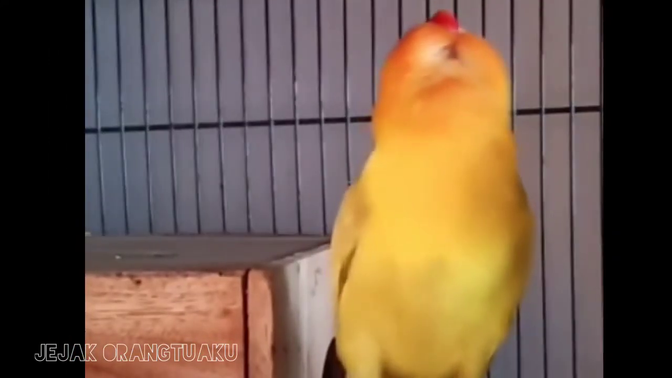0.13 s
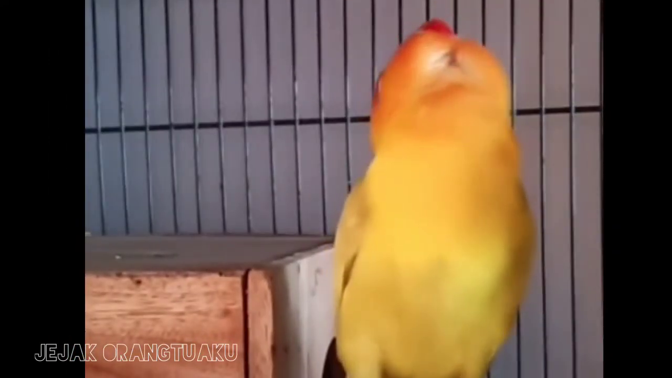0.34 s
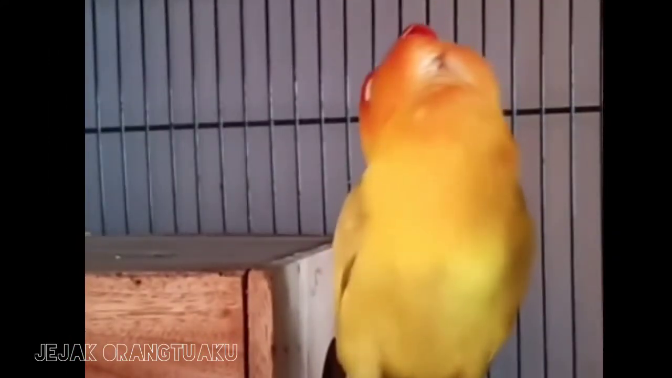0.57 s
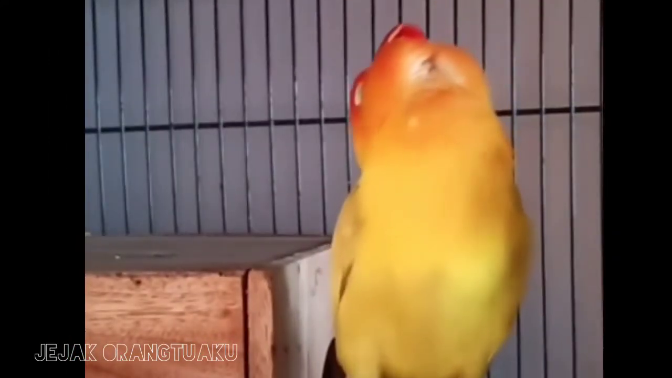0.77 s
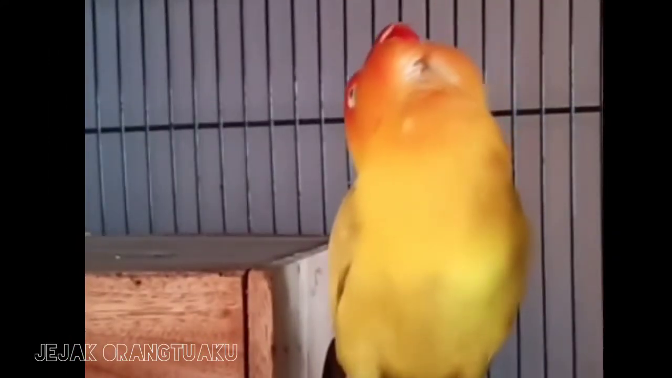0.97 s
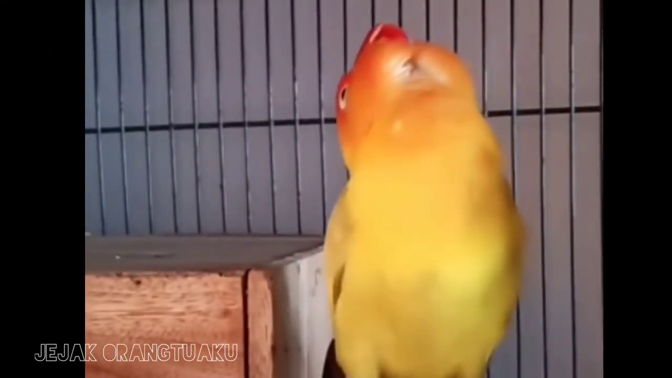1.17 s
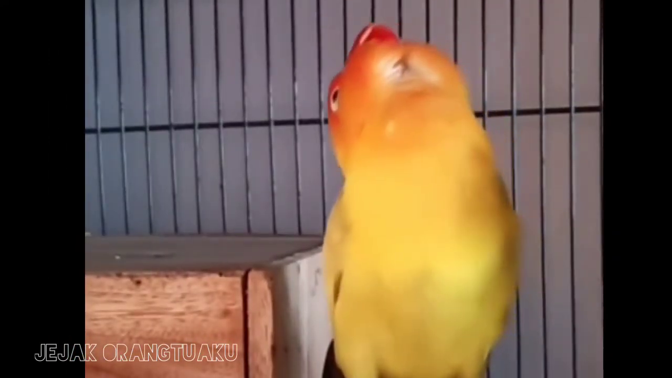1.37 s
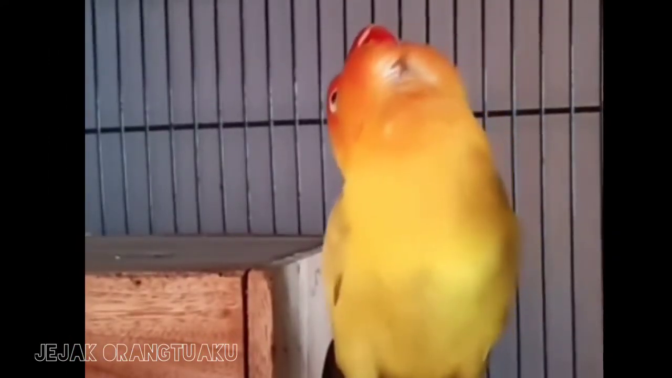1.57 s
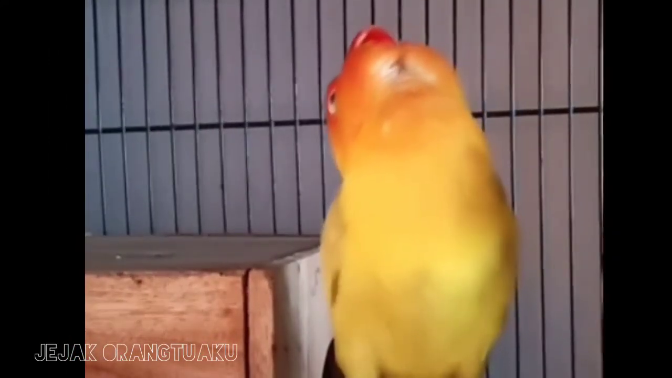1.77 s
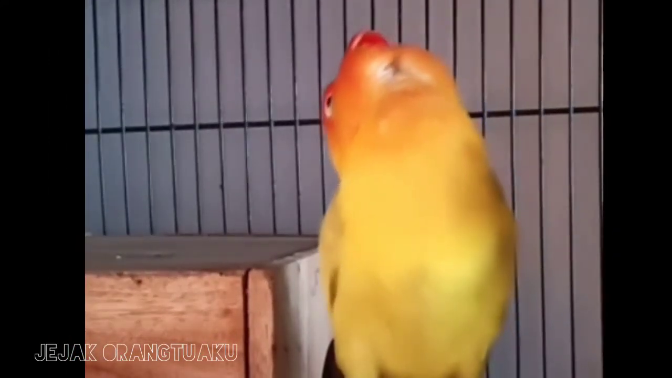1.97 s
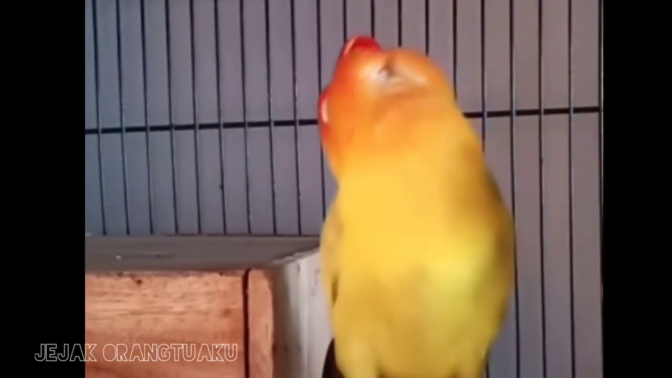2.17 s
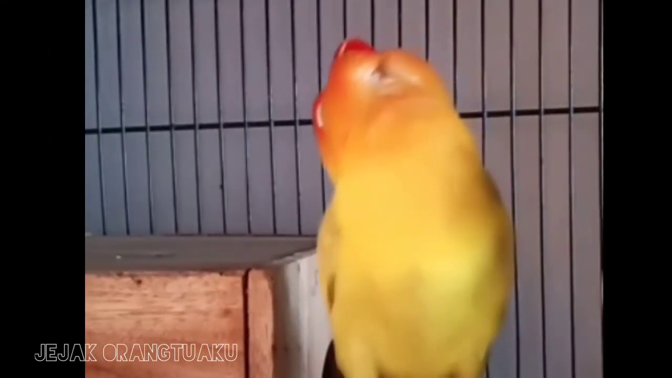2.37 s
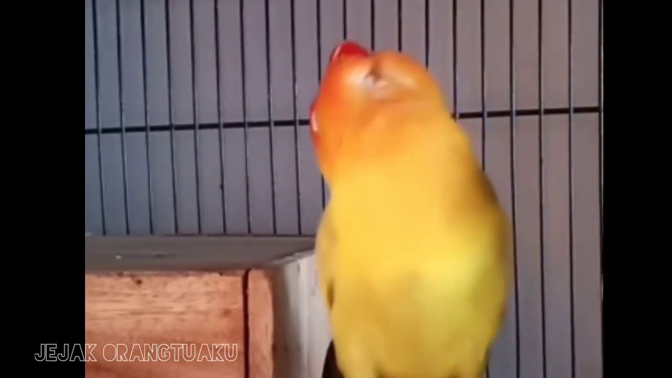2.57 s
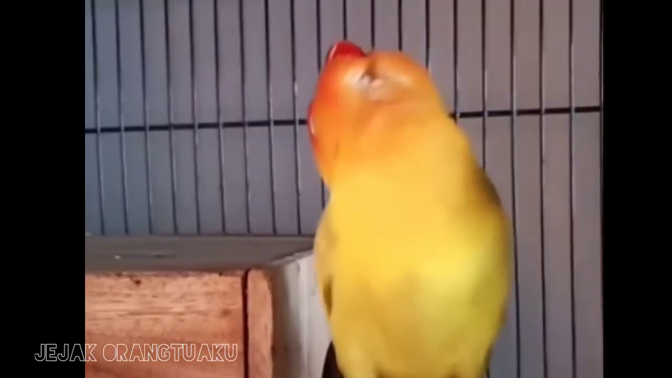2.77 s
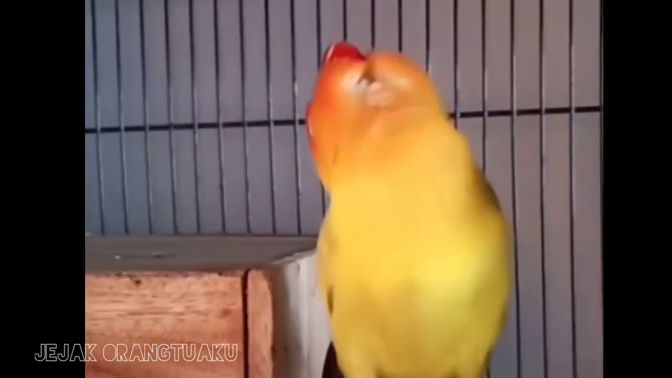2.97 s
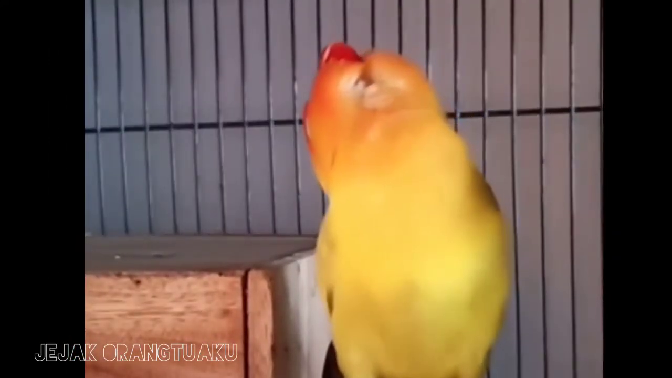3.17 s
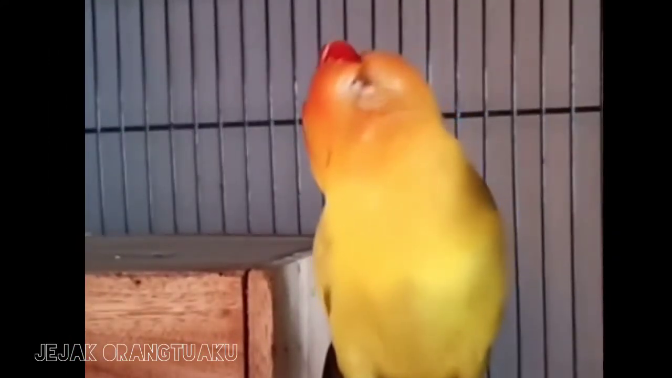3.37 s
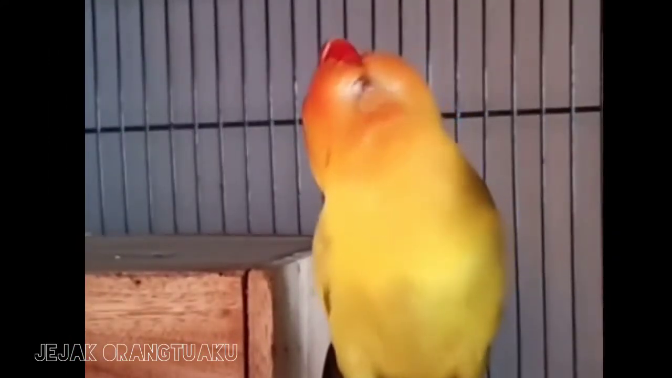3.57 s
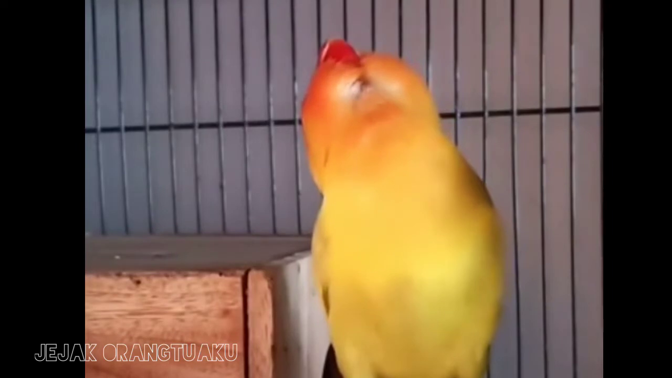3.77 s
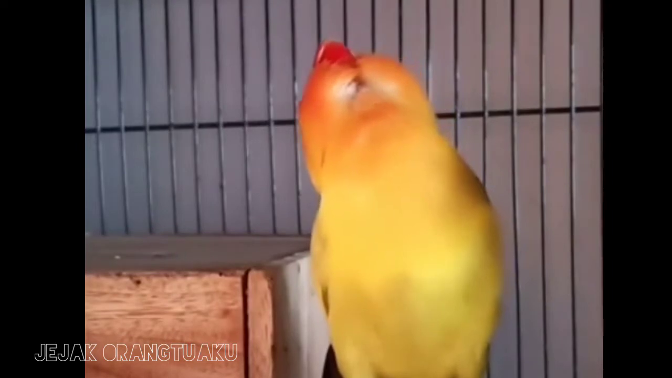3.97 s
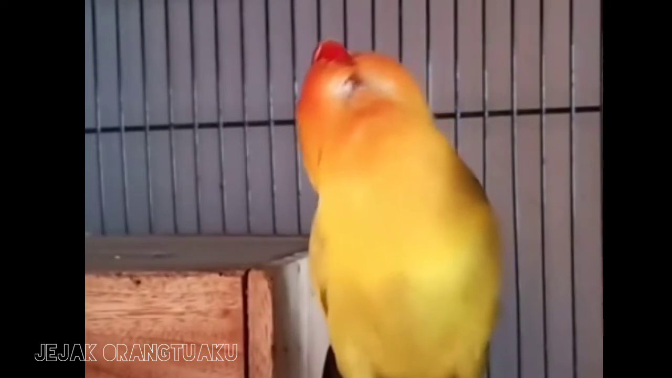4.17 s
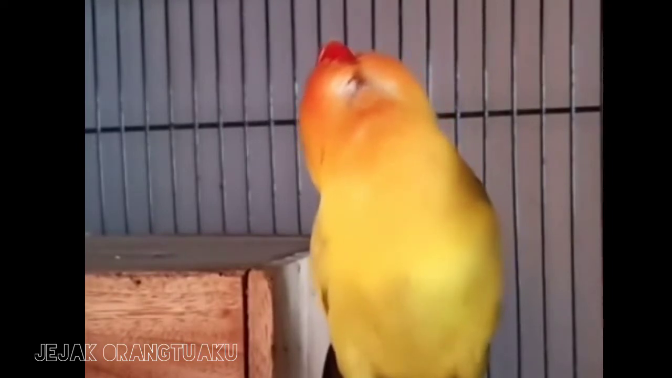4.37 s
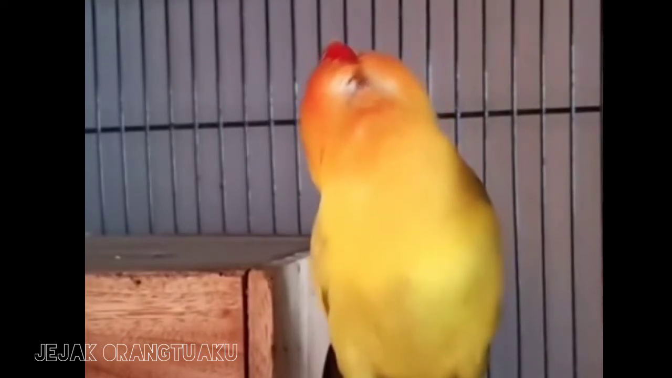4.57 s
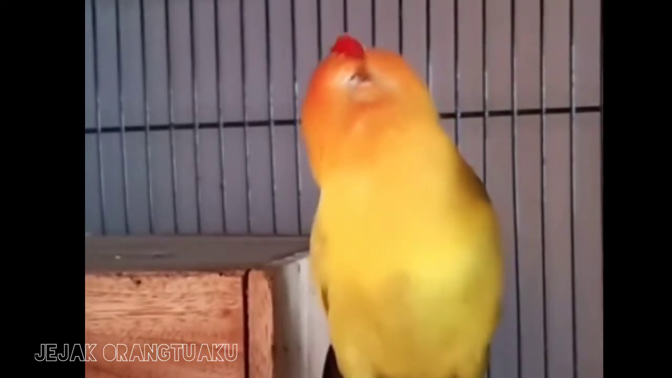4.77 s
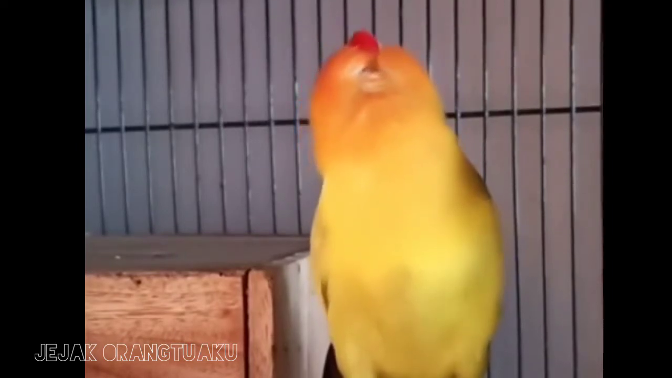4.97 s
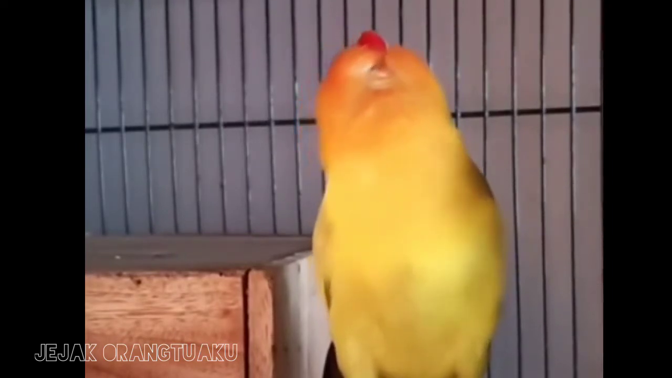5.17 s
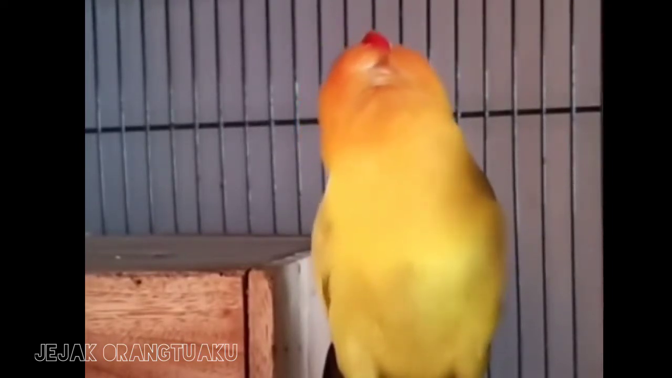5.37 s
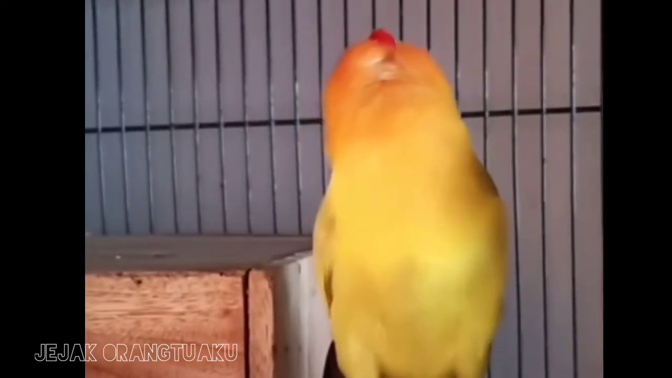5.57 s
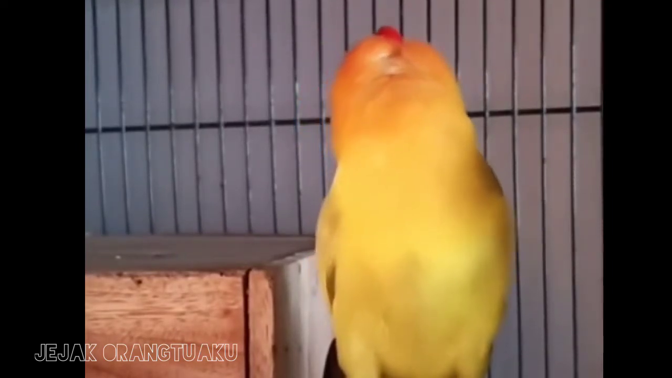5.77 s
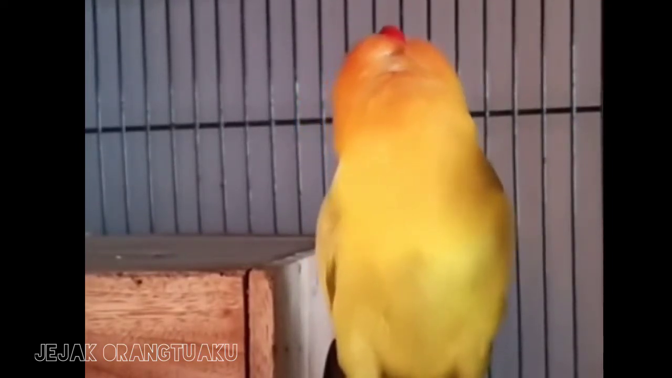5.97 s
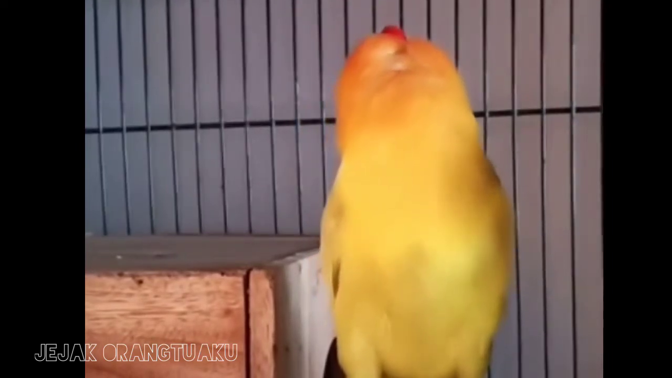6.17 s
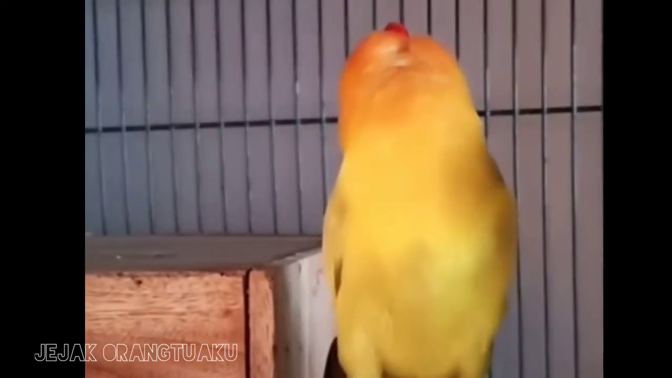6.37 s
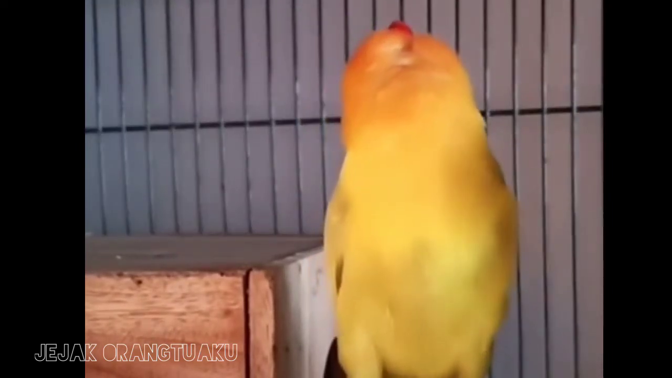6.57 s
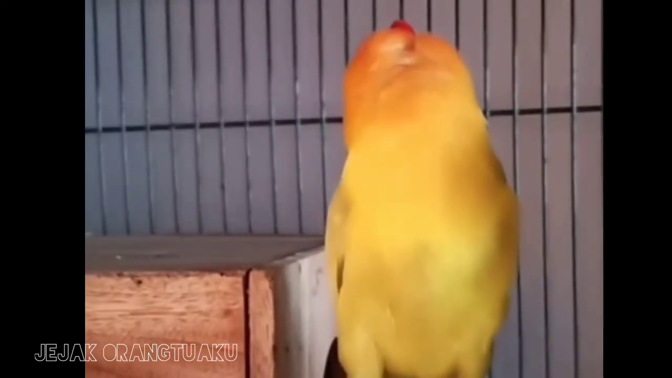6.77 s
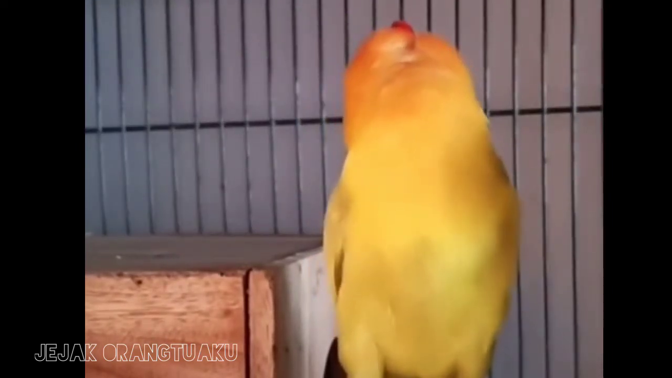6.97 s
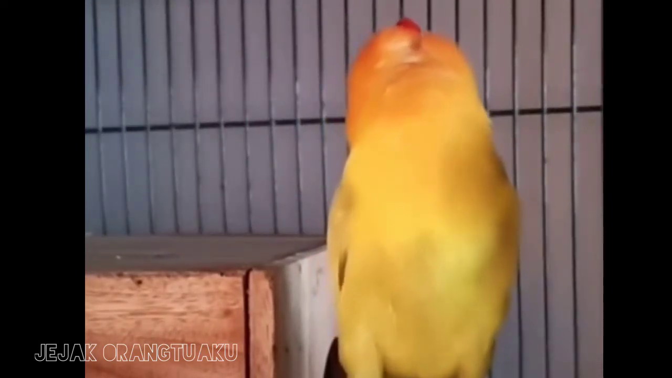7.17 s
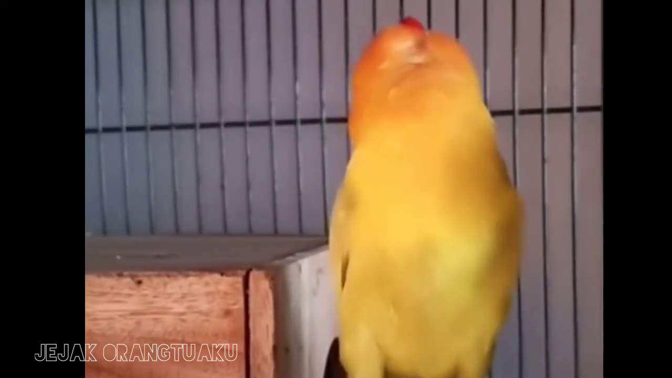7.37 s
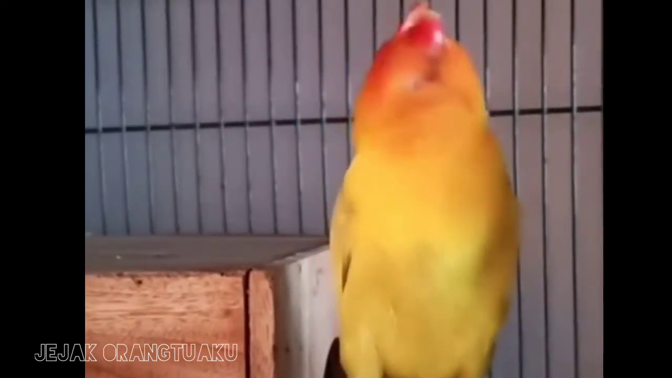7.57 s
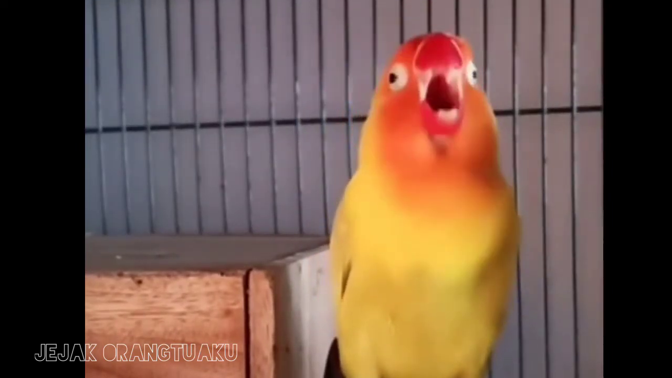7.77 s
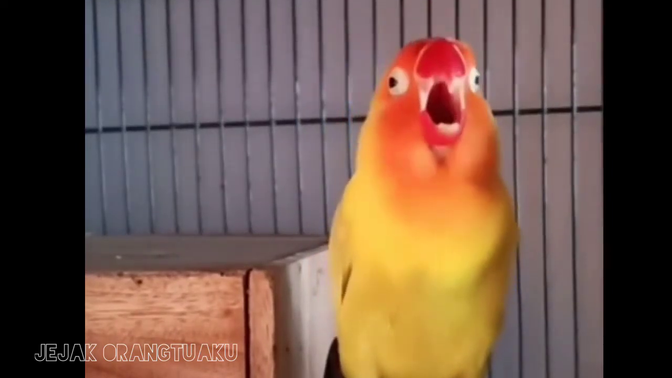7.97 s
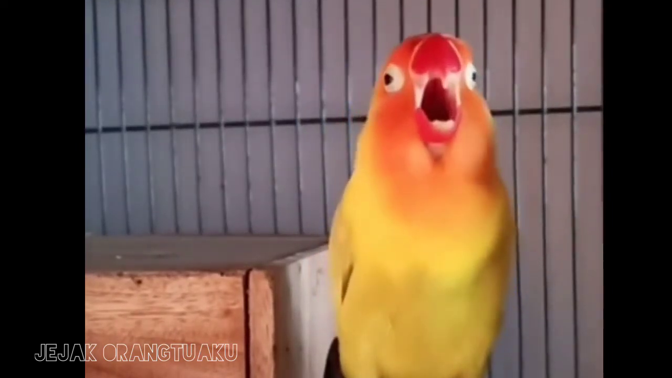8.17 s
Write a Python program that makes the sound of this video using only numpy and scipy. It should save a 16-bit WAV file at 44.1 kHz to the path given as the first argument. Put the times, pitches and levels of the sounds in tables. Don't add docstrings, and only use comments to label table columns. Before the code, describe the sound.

A small caged parrot very close to a stereo microphone fires short raspy chirps about nine per second, then shifts to longer, upward-turning chirps that gradually space out and stop. A bare room rings briefly after each. Outside, a lorry hums past and fades, a second engine follows, and faint bird whistles remain over a steady motor hum.

```python
import sys
import numpy as np
from scipy import signal
from scipy.fft import rfft, irfft, next_fast_len
from scipy.io import wavfile
from scipy.ndimage import uniform_filter1d, minimum_filter1d

SR = 44100
rng = np.random.default_rng(int(sys.argv[2]) if len(sys.argv) > 2 else 0)


def wav_record(signal):
    frames = np.transpose(np.atleast_2d(signal))
    bounded = np.clip(frames, -1, 1)
    quanta = np.round(bounded * 32767).astype(np.int16)
    wavfile.write(sys.argv[1], SR, quanta)


def gain_from_db(level_db):
    decades = np.asarray(level_db, float) / 20
    return 10 ** decades


N = 362943


def rms_one(x):
    return x / np.sqrt(np.mean(x ** 2) + 1e-20)


def at_hz(points, hz):
    points = np.array(points)
    return np.interp(np.log(np.maximum(hz, 1)), np.log(points[:, 0]), points[:, 1])


def noise():
    return rng.standard_normal(N)


def coloured(x, spectrum):
    gain = gain_from_db(at_hz(spectrum, np.fft.rfftfreq(N, 1 / SR)))
    return rms_one(irfft(rfft(x) * gain, N))


def filtered(x, order, hz, kind):
    return signal.sosfilt(signal.butter(order, hz, kind, fs=SR, output="sos"), x)


def wobble(hz):
    r = np.exp(-2 * np.pi * hz / SR)
    drift = signal.lfilter([1], [1, -2 * r, r * r], rng.standard_normal(N + SR))
    return rms_one(drift[SR:])


def turns(hz):
    return 2 * np.pi * np.cumsum(hz) / SR


def shape(start, knots, values):
    return np.interp(np.arange(N) / SR, start + np.asarray(knots), values)


# (pitch [Hz], level [dB])
THROAT_COLOUR = [(1300, -43), (1800, -21.5), (2300, -7.5), (3150, 0.5), (3800, -7), (4500, -9),
                 (5300, -5.5), (6400, -10.5), (7600, 4.5), (9000, -12.5), (11000, -19), (13600, -15),
                 (15200, -20), (16500, -7)]


def syrinx(pitch, second, rough, swing, depth_db, low_db=0, top_db=0, hook_db=0, count=9):
    pitch = pitch * (1 + 0.00302 * wobble(160) + swing * np.tanh(0.67 * wobble(490)))
    phase = turns(pitch)
    second_phase = turns(second * (1 + 0.033 * wobble(202.5)))
    clash = np.minimum(rough, 1)
    second_db = at_hz(THROAT_COLOUR, second) + low_db + 1.5 + 6.8 * wobble(152)
    out = clash ** 2 * gain_from_db(second_db) * np.sin(second_phase)
    beat = 1 + 0.85 * clash * np.cos(second_phase - phase)
    extra_db = {1: low_db, 2: hook_db, 3: -4 - hook_db, 4: 0}
    for k in range(1, count):
        shake_db = np.tanh(1.96 * wobble(384)) * depth_db * rough + 4.1 * wobble(70)
        level_db = at_hz(THROAT_COLOUR, k * pitch) + extra_db.get(k, top_db) + shake_db
        out = out + beat * gain_from_db(level_db) * np.sin(k * phase + k * k)
    return out


# (pitch [Hz], width [Hz], level [dB])
SOUND_HOLLOWS = [(3250, 380, -12), (5200, 450, -8), (13900, 800, -12)]


def dipped(x, hollows=SOUND_HOLLOWS):
    for hz, width_hz, db in hollows:
        band = signal.lfilter(*signal.iirpeak(hz, hz / width_hz, fs=SR), x)
        x = x - (1 - gain_from_db(db)) * band
    return x


# (time [s], level [dB], length [s], opening pitch [Hz])
CHATTER = [(-.043, -9, 0.043, 1830), (0.064, -13.5, 0.034, 1797), (0.175, -13, .044, 1795),
           (.285, -12.5, 0.041, 1832), (0.401, -14, 0.041, 1836), (0.513, -13.5, 0.044, 1799),
           (0.632, -12.7, 0.044, 1831), (0.751, -12, .05, 1876), (0.874, -12, .035, 1816),
           (.988, -13.5, .039, 1866), (1.108, -10, 0.039, 1850), (1.222, -12.5, 0.036, 1860),
           (1.338, -12.5, 0.04, 1838), (1.455, -12, 0.039, 1860), (1.572, -13, 0.049, 1829),
           (1.686, -13.5, 0.052, 1851), (1.808, -11, .036, 1862), (1.922, -13.5, 0.042, 1782),
           (2.031, -13.5, 0.046, 1848), (2.15, -13.5, 0.049, 1836), (2.278, -13.5, .048, 1898),
           (2.405, -12.5, 0.052, 1824), (2.531, -13.5, 0.05, 1828), (2.66, -11, 0.058, 1916)]
# (time [s], level [dB], length [s], opening pitch [Hz], closing pitch [Hz])
FULL_CHIRPS = [(2.793, -10, 0.064, 1845, 2287), (2.944, -11, 0.068, 1847, 2190),
               (3.105, -7, 0.067, 1815, 2187), (3.3, -9.5, 0.077, 1840, 2150),
               (3.505, -8.5, .078, 1795, 2145), (3.698, -9, 0.068, 1878, 2170),
               (3.889, -11, .078, 1846, 2128), (4.084, -10.5, 0.073, 1898, 2127),
               (4.278, -9, 0.077, 1851, 2171), (4.479, -9.5, 0.077, 1850, 2130),
               (4.68, -11, 0.079, 1877, 2100), (4.898, -10, 0.077, 1830, 2170),
               (5.127, -9.5, 0.072, 1875, 2175), (5.345, -11.5, .079, 1818, 2165),
               (5.567, -10.5, .079, 1880, 2120), (5.791, -12, 0.08, 1820, 2146),
               (6.01, -11.5, 0.073, 1831, 2105), (6.25, -11.5, 0.078, 1896, 2150),
               (6.487, -11.5, 0.077, 1840, 2146), (6.735, -11.5, 0.085, 1916, 2114),
               (7, -12.5, 0.083, 1888, 2244), (7.339, -12, 0.09, 1890, 2295)]


def song_controls():
    rattle_s, rattle_hz, settle_hz = 0.026, 1972, 2005.4
    low_open_db, low_rattle_db = -6.5, -4.5
    times, pitch, second, rough, level, wild, low_db = [], [], [], [], [], [], []
    song = [(*row, 2250) for row in CHATTER] + FULL_CHIRPS
    for s, db, length, opening, closing in song:
        bend, slip = 0.015 * rng.standard_normal(2)
        clean = 0.002 + 0.32 * length
        settle = min(clean + rattle_s, length - 0.004)
        calm = np.clip((length - 0.044) / 0.022, 0, 1)
        knots = [-0.0006, 0.0009, 0.005, clean - 0.001, clean + 0.002, settle, length - 0.002, length + 0.002]
        times += [s + t for t in knots]
        final_hz = settle_hz + calm * (closing - settle_hz)
        pitch += [0.93 * opening, 0.95 * opening, opening, (1.005 + bend) * opening]
        pitch += [rattle_hz * (1 + slip), settle_hz, final_hz, final_hz]
        second += 5 * [2250 + calm * (2496 - 2250)]
        second += 3 * [2800 + calm * (closing + 90 - 2800)]
        rough += [1.6, 0.6, 0.2, 0.2, 1 - 0.2 * calm, 1 - 0.4 * calm, 1 - 0.6 * calm, 1 - 0.65 * calm]
        level += [0, *(gain_from_db(db) * np.array([1.1, 1.4, 0.5, 0.79, 0.5, 0.39])), 0]
        wild += 8 * [1 - calm]
        low_db += 2 * [low_rattle_db] + 2 * [low_open_db] + 4 * [low_rattle_db]
    return [shape(0, times, values) for values in (pitch, second, rough, level, wild, low_db)]


# (pitch [Hz], level [dB per Hz])
BEAK_RASP = [(4400, -22), (6400, -3), (9000, 1), (12500, -5), (13900, -16), (15300, -5)]


def lovebird():
    pitch, second, rough, level, wild, low_db = song_controls()
    second = second * (1 + 0.05 * wild * wobble(250))
    swing = rough * (0.051 + 0.0739 * wild)
    hook_db = 4 * (rough < 0.55)
    voice = syrinx(pitch, second, rough, swing, 3.8, low_db, top_db=3.5 * wild, hook_db=hook_db)
    even = np.sqrt(uniform_filter1d(voice ** 2, size=600))
    breath = gain_from_db(-13 + 9.5 * wild) * (rough + 0.18) * coloured(noise(), THROAT_COLOUR)
    rasp = gain_from_db(-15) * (1 - wild) * (rough + 0.3) * coloured(noise(), BEAK_RASP)
    sound = dipped(level * (voice / even + breath + rasp))
    wild_share = 0.7 * wild
    return gain_from_db(7.5) * (wild_share * sound + (1 - wild_share) * dipped(sound, SOUND_HOLLOWS[::2]))


# (time [s], left minus right level [dB])
HEAD_TURNS = [(0, -1), (.6, 1.5), (.9, 0), (3.1, -0.5), (3.5, -2), (3.8, 1), (4.15, -2), (4.7, 1.5),
              (5, -1), (5.5, -0.5), (6.9, .5), (7.3, 1.5)]


def head_turned(near):
    pan_db = shape(0, *np.transpose(HEAD_TURNS))
    return near * gain_from_db(pan_db * [[0.5], [-0.5]])


# (pitch [Hz], lead [radians])
PORT_LEAD = [(0, -3.5), (1810, -3), (2410, -7.5), (3960, -10.5), (4910, -13), (5770, -9), (6200, -8.5),
             (6980, -7.5), (7670, -9.5), (8180, -11.5), (10100, -22), (12600, -43.5), (13400, -22),
             (16400, -53.5)]
# (pitch [Hz], left minus right level [dB])
PORT_TILT = [(60, 6), (110, 0.0), (200, -44), (380, -22), (700, -7.5), (1290, 0.5), (2380, -0.5),
             (4400, 3.5), (8120, -2), (15000, 3)]
# (lag [s], level [dB])
NEAR_WALLS = [(.0021, -10), (.0046, -8.5), (.0083, -6.5), (0.0139, -19.5), (0.0187, -19)]


def ports(x):
    size = next_fast_len(N + 4096)
    hz = np.fft.rfftfreq(size, 1 / SR)
    half = gain_from_db(at_hz(PORT_TILT, hz) / 2) * np.exp(0.5j * np.interp(hz, *np.transpose(PORT_LEAD)))

    def walls(skew):
        return 1 + sum(gain_from_db(db) * np.exp(-2j * np.pi * hz * lag * skew) for lag, db in NEAR_WALLS)

    paths = np.array([half * walls(0.86), walls(1.17) / half])
    return irfft(rfft(x, size) * paths, size)[:, :N]


# (pitch [Hz], time to fall 60 dB [s])
ROOM_RING = [(1000, 0.45), (2200, 0.72), (4000, 0.54), (7500, 0.45), (11000, 0.38), (16000, 0.31)]


def room(x, alike):
    size, t = next_fast_len(N + SR), np.arange(SR) / SR
    x = filtered(x, 4, 1500, "high")
    white = rng.standard_normal((3, SR)) * (1 - np.exp(-np.maximum(t - 0.003, 0) / 0.0018))
    edges = np.geomspace(700, 19000, 9)
    tails = 0
    for low, high in zip(edges, edges[1:]):
        ring_s = at_hz(ROOM_RING, np.sqrt(low * high))
        tails = tails + filtered(white, 2, [low, high], "band") * gain_from_db(-60 * t / ring_s)
    echoes = irfft(rfft(x, size) * rfft(tails / np.sqrt(SR / 20), size), size)[:, :N]
    return np.sqrt(alike) * ports(echoes[0]) + np.sqrt(1 - alike) * echoes[1:]


# (time [s], nearness level [dB])
LORRY = [
    (0, -6.5),
    (.6, -2),
    (1.0, -2.5),
    (1.9, 0.5),
    (2.3, -6.5),
    (2.75, -5),
    (3.2, -16.5),
    (3.9, -29),
    (6.3, -45),
]
# (time [s], nearness level [dB])
ENGINE = [
    (3.9, -21),
    (4.25, -1.5),
    (4.65, -2),
    (5.0, -5),
    (5.9, -1),
    (6.2, -9.5),
    (6.45, -3.5),
    (7.2, -12.5),
    (7.45, -24),
]


def passing(lorry_db, lorry_share, engine_db, engine_share):
    lorry, engine = [shape(0, *np.transpose(rows)) for rows in (LORRY, ENGINE)]
    return np.hypot(gain_from_db(lorry_db + lorry_share * lorry), gain_from_db(engine_db + engine_share * engine))


# (pitch [Hz], level [dB per Hz])
RUMBLE_COLOUR = [(88, -32), (150, -4), (189, -24.5), (312, -16), (354, -19), (393, -16.5), (600, -46),
                 (780, -50), (1320, -120)]
# (pitch [Hz], level [dB per Hz])
TYRE_COLOUR = [(260, -23), (450, 0), (1020, -3), (1190, 1), (1360, -14.5), (1600, 2), (2080, -20),
               (3520, -120)]
# (pitch [Hz], level [dB])
MOTOR_TONES = [(102.3, -60), (129.2, -40.5), (150.7, -53), (301.5, -56.5)]


def traffic():
    late = shape(7.35, [0, 0.15], [0, 1])
    engine_hz = shape(3.5, [0, 0.6], [115, 117.4])
    phase = turns(engine_hz * (1 + 0.021 * wobble(1.495)))
    drone = rms_one(wobble(19.6) * np.cos(phase) + wobble(13.9) * np.sin(phase))
    drone *= passing(-26, 0.8, -31, 0.7) * gain_from_db(1.7 * wobble(3.3))
    mid, side = [coloured(noise(), RUMBLE_COLOUR) for port in range(2)]
    side = filtered(side, 2, 300, "high")
    rumble_gain = passing(-47, 1.1, -53, 1.5) * gain_from_db(14) + late * gain_from_db(-58)
    rumble = rumble_gain * gain_from_db(1.3 * wobble(8.4)) * (mid + 0.34 * side * [[1], [-1]])
    hiss_db = -39 + 0.76 * shape(0, *np.transpose(LORRY)) + 2.2 * wobble(15)
    hiss = gain_from_db(hiss_db) * np.array([coloured(noise(), TYRE_COLOUR) for port in range(2)])
    t = np.arange(N) / SR
    motor = sum(gain_from_db(db + 1.5 * wobble(6.7)) * np.sin(2 * np.pi * hz * t) for hz, db in MOTOR_TONES)
    return drone + rumble + hiss + motor * late


def boom():
    low = rms_one(filtered(noise(), 3, [48, 85], "band"))
    return passing(-42.5, 0.55, -49, 0.9) * gain_from_db(2.5 * np.tanh(wobble(3))) * low


# (pitch [Hz], level [dB])
AIR_COLOUR = [(290, -63), (500, -17.5), (2900, 22), (5580, -9), (6060, 21.5), (6500, 16), (12300, -10.5),
              (14000, -39)]


def air_hiss():
    return gain_from_db(-48.5) * np.array([coloured(noise(), AIR_COLOUR) for port in range(2)])


def squawk():
    start_s, length, hz = 3.205, 0.095, 1200
    voice = syrinx(np.full(N, hz), np.full(N, 2.4 * hz), 1, swing=0.2, depth_db=4, low_db=-8, count=7)
    breath = coloured(noise(), [(1200, -18), (2400, 0), (3800, -2), (9000, -14)])
    call = rms_one(filtered(rms_one(voice) + 1.2 * breath, 3, [1100, 8500], "band"))
    swell = shape(start_s, [-0.01, 0.025, 0.6 * length, length, length + 0.03], [0, 0.7, 1, 0.6, 0])
    return gain_from_db(-29) * call * swell


# (time [s], level [dB], length [s], start pitch [Hz], held pitch [Hz])
WHISTLES = [
    (7.646, -54.5, 0.2, 3820, 6090),
    (7.894, -55.5, 0.28, 3900, 6120),
    (8.146, -54.5, 0.23, 3920, 6030),
    (7.552, -46.5, 0.059, 3240, 3095),
    (7.737, -52, 0.062, 2950, 2837),
    (7.974, -44, 0.041, 2433, 2470),
    (7.995, -63, 0.07, 2960, 2980),
    (8.194, -50, 0.037, 2420, 2480),
    (8.203, -58, .018, 3050, 3050),
]


def far_birds():
    out, tremble = np.zeros(N), wobble(130)
    for s, db, length, start, held in WHISTLES:
        rise = 0.31 * length
        pitch = shape(s, [0, 0.3 * rise, rise, length],
                      [start, start + 0.45 * (held - start), 0.98 * held, 1.015 * held])
        phase = turns(pitch * (1 + 0.011 * tremble))
        swell = shape(s, [0, min(0.008, 0.4 * rise), 0.45 * rise, 0.8 * rise, rise, 0.7 * length, length],
                      [0, 1.5, 0.6, 0.1, 0.8, 1, 0])
        out += gain_from_db(db) * swell * (np.sin(phase) + gain_from_db(-23) * np.sin(2 * phase))
    return out


def scene():
    bird, hoarse, far = lovebird(), squawk(), far_birds()
    near = head_turned(ports(bird))
    earlier = gain_from_db(1) * shape(0, [0, 0.004, 0.005], [1, 1, 0]) * coloured(noise(), THROAT_COLOUR)
    echo = room(earlier + gain_from_db(-2) * bird + gain_from_db(15) * hoarse + gain_from_db(21) * far, alike=0.39)
    distant = gain_from_db(3.5) * hoarse + gain_from_db(7.5) * far * [[1], [0.8]]
    return near + distant + echo + traffic() + boom() + air_hiss()


def gain_control(x):
    level_db = 10 * np.log10(uniform_filter1d(np.mean(x ** 2, axis=0), size=260) + 1e-12)
    fall = 330 * np.arange(N) / SR
    held = np.maximum.accumulate(level_db + fall) - fall
    cut_db = 0.45 * np.maximum(held + 21, 0)
    r = np.exp(-1 / (0.005 * SR))
    cut_db = np.roll(signal.lfilter([1 - r], [1, -r], cut_db), -int(0.012 * SR))
    bass = signal.sosfiltfilt(signal.butter(2, 457, fs=SR, output="sos"), x)
    return (x - bass * (1 - gain_from_db(-0.35 * cut_db))) * gain_from_db(-cut_db)


def masked(x, margin_db, quiet_db):
    spectra = signal.stft(x, nperseg=1024, noverlap=768)[2]
    bands = spectra[:, :510].reshape(2, 85, 6, -1)
    power = np.mean(np.abs(bands) ** 2, axis=(0, 2))
    level_db = 10 * np.log10(uniform_filter1d(power, size=6, axis=1) + 1e-14)
    loudest = -minimum_filter1d(-level_db, size=9, axis=0)
    keep = np.where(level_db > np.maximum(loudest - margin_db, quiet_db), 1, 0.04)
    keep[:6] = np.maximum(keep[:6], np.array([[1, 1, 1, 1, 0.6, 0.4]]).T)
    spectra[:, :510] *= np.repeat(uniform_filter1d(keep, size=2, axis=1), 6, axis=0)
    return signal.istft(spectra, nperseg=1024, noverlap=768)[1][:, :N]


def band_limit(x):
    return signal.sosfilt(signal.butter(12, 16820, fs=SR, output="sos"), x)


def record(dry):
    x = gain_control(dry)
    x = x + 0.038 * filtered(x ** 2, 2, [250, 900], "band")
    rounded = 1.3 * np.tanh(x / 1.3)
    x = signal.sosfilt(signal.ellip(8, 0.5, 50, 15600, fs=SR, output="sos"), rounded)
    mix = np.clip(masked(x, margin_db=19, quiet_db=-86.5), -1, 1)
    return band_limit(mix)


dry = scene()
out = record(dry)
wav_record(out)
```